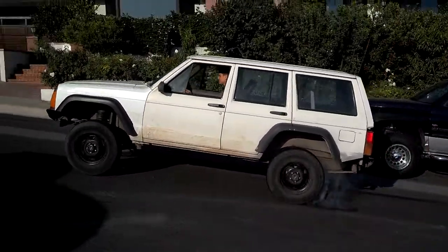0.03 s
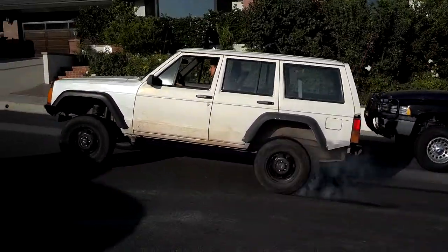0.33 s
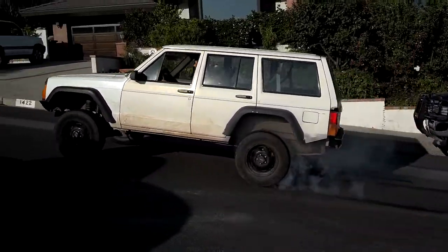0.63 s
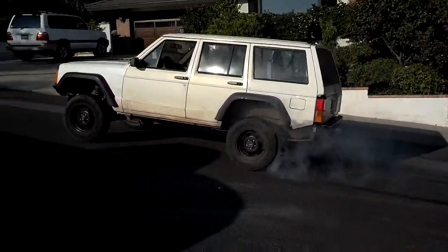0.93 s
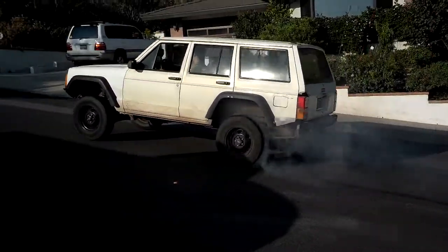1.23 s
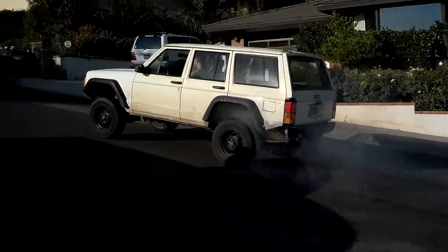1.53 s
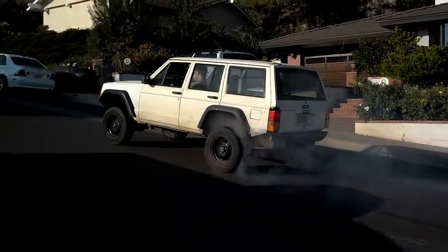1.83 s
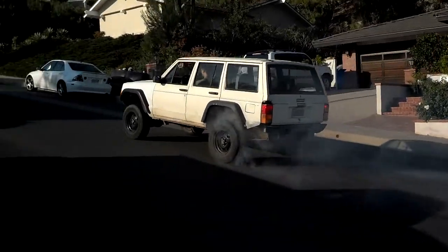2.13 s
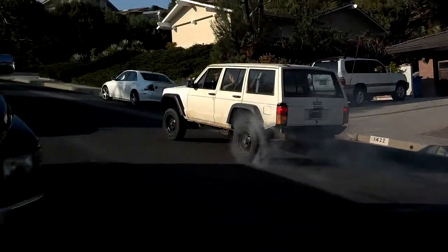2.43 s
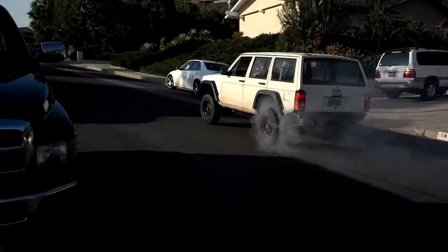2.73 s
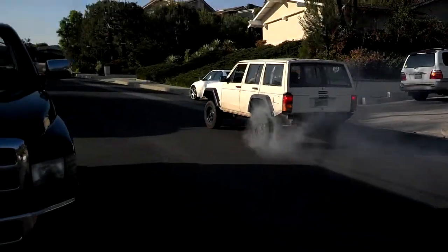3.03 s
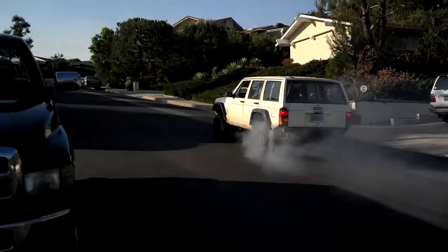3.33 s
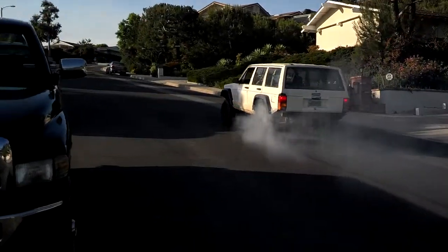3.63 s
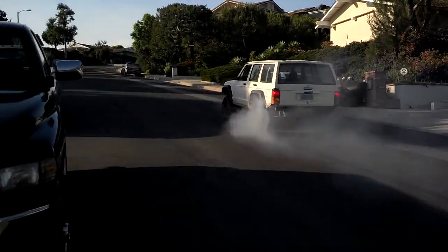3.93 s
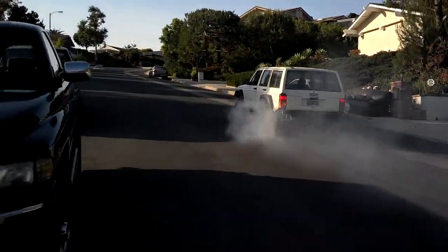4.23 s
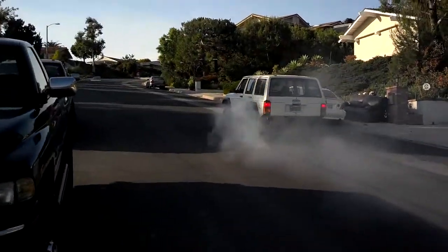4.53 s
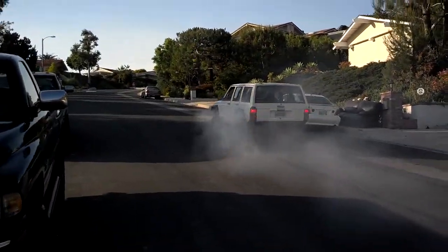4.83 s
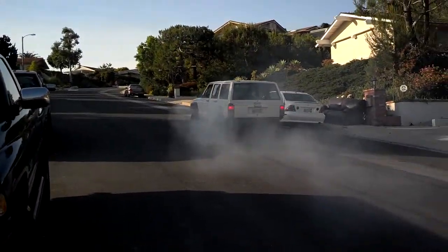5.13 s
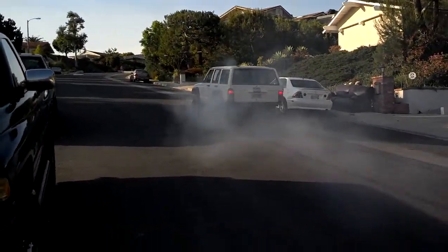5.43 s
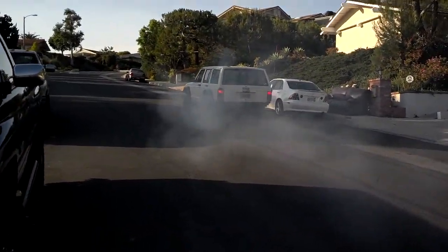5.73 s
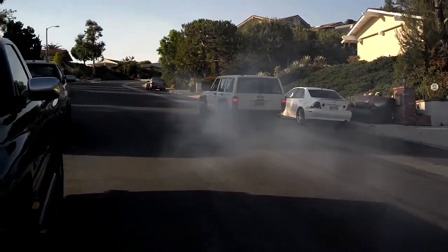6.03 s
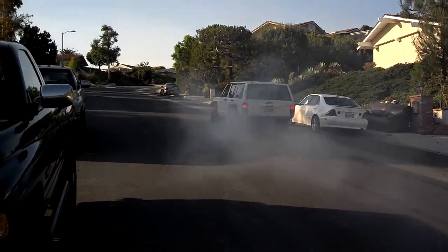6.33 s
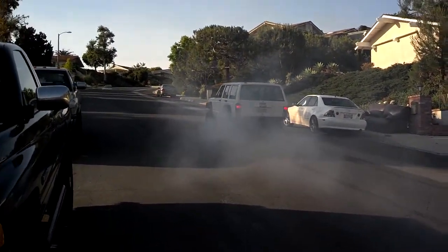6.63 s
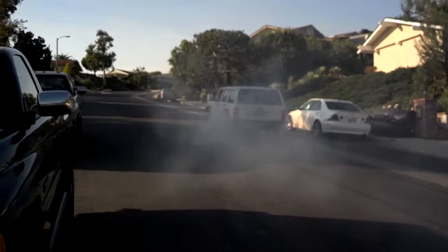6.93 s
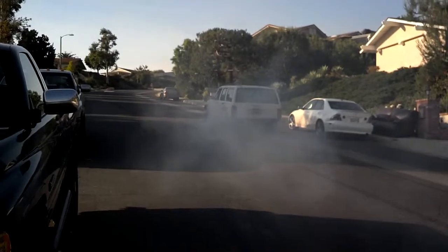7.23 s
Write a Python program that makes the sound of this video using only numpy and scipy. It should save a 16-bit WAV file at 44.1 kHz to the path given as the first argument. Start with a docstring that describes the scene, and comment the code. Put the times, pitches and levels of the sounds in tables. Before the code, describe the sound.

An SUV does a burnout, its engine droning hard while a spinning tyre scrubs, howls and chirps on asphalt, slowly moving away.

```python
"""A six-cylinder SUV does a burnout up a residential street and slowly moves away.
Its engine pulls hard, stumbles with three thuds, drones, then revs up again; each firing sends a
puff of gas down the exhaust pipe. The spinning rear tyre sticks and slips on the asphalt, so it
scrubs, howls and chirps, and it sprays hissing grit. Near the end a house front echoes the exhaust.
A small stereo microphone listens through two openings, its left and right ports."""
import sys
import numpy as np
from scipy import signal
from scipy.fft import rfft, irfft, next_fast_len
from scipy.io import wavfile
from scipy.ndimage import uniform_filter1d, map_coordinates

SR = 44100
rng = np.random.default_rng(int(sys.argv[2]) if len(sys.argv) > 2 else 0)


def output_pcm(signal):
    """Save a mono or channel-first signal as 16-bit PCM at the path in sys.argv[1].

    Samples are clipped to [-1, 1] before scaling.
    """
    pcm = np.clip(np.atleast_2d(signal).T, -1, 1) * 32767
    wavfile.write(sys.argv[1], SR, np.round(pcm).astype(np.int16))


N = 330309
CALM_HZ, CRUISE_HZ = 198, 218.6  # engine firings a second: running calmly, cruising
PIPE_LOW_HZ = 70.4  # the open exhaust pipe gives off little sound below this


def amp(db):
    """Turn decibels into a gain to multiply by."""
    return 10 ** (np.asarray(db) / 20)


def unit(x):
    """Scale a signal so that its average level (rms) is 1."""
    return x / np.sqrt(np.mean(x ** 2) + 1e-20)


def along(points, hz):
    """Read between (pitch_hz, value) points, with octaves evenly spaced."""
    pitches, values = np.transpose(points)
    return np.interp(np.log(hz + 1), np.log(pitches + 1), values)


def curves(rows):
    """Turn each column after the time into one value per sample."""
    times, *columns = np.transpose(rows)
    return [np.interp(np.arange(N) / SR, times, column) for column in columns]


def bump(middle_s, half_s):
    """A smooth swell that reaches 1 at middle_s."""
    return np.exp(-((np.arange(N) / SR - middle_s) / half_s) ** 2)


def wobble(rate):
    """A smooth curve through `rate` random values a second."""
    at = np.linspace(0, rate * N / SR, N // 16)
    coarse = map_coordinates(rng.standard_normal(8192), [at], mode="wrap")
    return np.interp(np.arange(N), np.linspace(0, N, len(at)), coarse)


def throb(turns, depth):
    """A gain that swells once a turn."""
    return unit(1 + depth * np.cos(2 * np.pi * turns))


def filtered(x, response):
    """Change the strength and phase of each frequency in x by response(hz)."""
    size = next_fast_len(N + 8192)
    return irfft(rfft(x, size) * response(np.fft.rfftfreq(size, 1 / SR)), size)[..., :N]


def rush(spectrum, patchy_db):
    """Stereo noise of level 1, shaped by a spectrum, with brief louder and softer patches."""
    # how alike the two ports sound: pitch_hz, likeness (0-1)
    alike = [(40, 0.36), (100, 1), (400, 0.88), (800, 0.78), (1600, 0.54), (2400, 0.72), (3200, 0.44),
             (5000, 0.16), (8000, 0.034)]
    cells = signal.stft(rng.standard_normal((2, N)), nperseg=1024)[2]
    patches = uniform_filter1d(rng.standard_normal(cells.shape[1:]), size=3, axis=0)
    patches = uniform_filter1d(patches, size=3, axis=1)
    pair = signal.istft(cells * amp(patchy_db * unit(patches)), nperseg=1024)[1][:, :N]

    def colour_and_spread(hz):
        spread = np.arccos(np.clip(along(alike, hz), -1, 1)) / 2
        return amp(along(spectrum, hz)) * [np.cos(spread), np.sin(spread)]

    mid, side = filtered(pair, colour_and_spread)
    return unit(np.array([mid + side, mid - side]))


def engine_load():
    """How hard the engine works (0-1): load builds as each pull starts and lets go after it."""
    # pulls at full load: start_s, end_s
    pulls = [(-0.3, 0.767), (6.82, 7.5)]
    rise_s, fall_s, free_load = 0.048, 0.074, 0.047
    t = np.arange(N) / SR
    pull = sum(np.clip((t - start) / rise_s, 0, 1) * np.clip(1 - (t - end) / fall_s, 0, 1)
               for start, end in pulls)
    return free_load + (1 - free_load) * pull


def engine_drone(firing_hz, firings, load, ragged):
    """Even firings make a steady note and a second one an octave above it."""
    # the note at the firing rate: time_s, level_db
    drone_levels = [(0, -26.5), (.3, -23), (.44, -30.5), (.58, -20), (.803, -26), (.813, -14.5),
                    (.835, -23), (.885, -17.5), (1.03, -22.5), (1.95, -17), (2.3, -21), (2.9, -18.5),
                    (3.85, -23.5), (4.5, -20), (5.1, -24), (5.55, -20), (5.9, -21), (6.85, -19), (7.2, -23),
                    (7.33, -28.5), (7.49, -21.5)]
    # how strongly the pipe sounds the octave, running free and under load: pitch_hz, free_db, loaded_db
    octave_levels = [(354, -24, -25.5), (383.7, -33, -27.5), (395.4, -25, -36), (409.2, -43.5, -36),
                     (425.6, -33.5, -24.5), (460, -37.5, -22.5), (477, -38, -22), (486, -28, -30),
                     (492, -23, -42), (500, -29, -24), (519, -35, -29), (526, -35, -40)]
    angle = 2 * np.pi * firings
    shake = 0.044 + 0.058 * load
    drone_db, = curves(drone_levels)
    drone = amp(drone_db + 0.75 * wobble(14)) * (1 + shake * wobble(40)) * np.sin(angle)
    pitch_hz, free_db, loaded_db = np.transpose(octave_levels)
    octave_db = (1 - load) * np.interp(2 * firing_hz, pitch_hz, free_db)
    octave_db += load * np.interp(2 * firing_hz, pitch_hz, loaded_db)
    octave_gain = amp(octave_db + 1.27 * wobble(11)) * (1 + (shake + ragged) * wobble(50))
    return drone + octave_gain * np.sin(2 * angle + rng.uniform(0, 2 * np.pi))


def engine_growl(firing_hz, firings, load, ragged):
    """Unequal cylinders add fluttering tones at multiples of the engine cycle (six firings)."""
    # exhaust tones, running free and under load: cycle_multiple, free_db, loaded_db
    tones = [(4, -36.5, -33), (5, -46.5, -50), (7, -43, -39.5), (8, -41.5, -32.5), (9, -34.5, -37.5),
             (10, -42.5, -32.5), (11, -56, -46), (14, -47, -31.5), (15, -45.5, -42), (16, -51, -36),
             (17, -50, -41), (18, -41.5, -36), (20, -43, -42), (21, -45.5, -51), (24, -37.5, -44)]
    # pipe resonances lift or lower each tone that glides through them: pitch_hz, gain_db
    pipe = [(125, -11.5), (150, -9), (175, 2.5), (235, -5.5), (255, 0.5), (290, 1), (325, -2), (352, 6),
            (390, 2), (418, 1.5), (445, -3.5), (500, 0), (560, -0.5), (616, 3.5), (660, 1), (715, -3),
            (754, 4.5), (785, -4.5), (830, -2)]
    # single tones swell or sink for a while: middle_s, half_length_s, cycle_multiple, gain_db
    swells = [(.1, 0.084, 4, 10), (.08, .17, 14, -21), (0.43, 0.12, 10, 8), (.5, .14, 8, -10),
              (0.624, 0.15, 14, 4), (1.9, 1.4, 8, 4.5), (1.58, 0.17, 9, 3), (2.6, .2, 9, 5),
              (5.95, .3, 9, 1), (6.07, 0.2, 24, 4.5), (6.72, .3, 18, 4.5), (6.8, .25, 9, 2),
              (6.85, .11, 14, -13), (6.953, 0.089, 10, 4.5), (7.38, 0.15, 10, -15), (7.38, .16, 9, -9),
              (7.47, .09, 18, -9)]
    cylinders = 6
    angle = 2 * np.pi * firings
    loaded_rise_db = np.linspace(0, 0.5, N)
    growl = np.zeros(N)
    for multiple, free_db, loaded_db in tones:
        ratio = multiple / cylinders
        level_db = free_db + load * (loaded_db + loaded_rise_db - free_db)
        level_db += along(pipe, ratio * firing_hz) + 1.17 * wobble(12)
        level_db += sum(db * bump(s, half_s) for s, half_s, tone, db in swells if tone == multiple)
        depth = 0.42 if multiple % 3 else 0.2  # tones from a group of three cylinders are the steadiest
        drift = rng.uniform(0, 2 * np.pi) + (0.22 + ragged) * wobble(30)
        flutter = 1 + (depth + ragged + 0.08 * load) * wobble(45)
        growl += amp(level_db) * flutter * np.sin(ratio * angle + drift)
    return growl


def gas_roar(firings, load):
    """Swirling gas leaves the pipe in one puff per firing."""
    # spectrum of the gas noise: pitch_hz, relative_db
    spectrum = [(20, -60), (50, -48), (70, -39), (100, -9), (150, -12), (290, 1.5), (355, 3), (480, -4),
                (700, -4), (1200, -8.5), (3000, -73)]
    roar = rush(spectrum, patchy_db=2.5) * throb(firings, depth=0.3)
    roar = filtered(roar, lambda hz: 1 / np.hypot(1, (PIPE_LOW_HZ / (hz + 1)) ** 4))
    return amp(np.linspace(-35, -37.4, N) + 2.6 * load) * roar


def engine(firing_hz, firings):
    """Drone, growl and roar together. Running fast without load, the engine burns less evenly."""
    load = engine_load()
    ragged = 0.28 * (1 - load) * np.clip((firing_hz - CALM_HZ) / (CRUISE_HZ - CALM_HZ), 0, 1)
    drone = engine_drone(firing_hz, firings, load, ragged)
    growl = engine_growl(firing_hz, firings, load, ragged)
    return drone + growl + gas_roar(firings, load)


def squeal(hz, width_hz):
    """A fuzzy note of level 1, like rubber kept ringing by irregular slips."""
    angle = 2 * np.pi * np.cumsum(hz) / SR
    return unit(wobble(width_hz) * np.cos(angle) + wobble(width_hz) * np.sin(angle))


def tyre_rubber(speed_octaves, firings, dig_db):
    """Rubber sticks and slips, juddering as the tread slaps the road. Faster: more scrub, less howl."""
    # the two notes at which the rubber rings: time_s, low_hz, high_hz, low_level_db
    notes = [(0, 773, 1706, -9.5), (1.5, 834, 1666, -11.5), (3.1, 758.4, 1607, -9.5),
             (3.8, 781.2, 1752, -8), (4.3, 780, 1748, -9), (5.1, 779, 1614, -8), (5.8, 765, 1600, -17),
             (7.49, 716, 1584, -15)]
    # spectrum of the scrubbing: pitch_hz, relative_db
    scrub_spectrum = [(300, -64), (520, -7), (760, -2.5), (980, -7), (1220, -2.5), (1450, -6.5),
                      (1900, -12), (2400, -13), (4000, -93)]
    # spectrum of the howl: pitch_hz, relative_db
    howl_spectrum = [(900, -36), (1300, -0.5), (1600, 3.5), (1800, 3.5), (2050, 0), (2400, -5), (3200, -11),
                     (6000, -44)]
    low_hz, high_hz, low_db = curves(notes)
    heat = np.linspace(0, 1, N)  # as the rubber warms, it sings more and scrapes less
    judder = unit(amp(0.38 * wobble(190)))
    scrub = amp(-2 - 0.59 * heat) * rush(scrub_spectrum, patchy_db=2.0)
    scrub += amp(low_db) * squeal(low_hz, width_hz=80)
    chatter = unit(amp(3.0 * wobble(260)) * squeal(high_hz, width_hz=130))  # rings in short bursts
    howl = amp(-2 - 3.5 * heat) * rush(howl_spectrum, patchy_db=3.5)
    howl += amp(-12 + 4.5 * heat) * chatter
    howl *= throb(firings, depth=0.086) * unit(amp(1.1 * wobble(25)))
    return (amp(2.5 * speed_octaves + dig_db) * scrub + amp(-8 * speed_octaves) * howl) * judder


def grit_spray(speed_octaves, dig_db):
    """Grit torn off the asphalt makes a rough hiss, louder when the wheel spins faster."""
    # spectrum of the hiss: pitch_hz, relative_db
    spectrum = [(1000, -34), (2300, 2), (3300, 1.5), (4000, 1.5), (5000, -3), (6000, -8.5), (7000, -11),
                (8200, -17.5), (9600, -11.5), (12000, -16.5), (15500, -14)]
    # the finest fizz is lost with distance: pitch_hz, fading_share (0-1)
    fading = [(5000, 0.021), (9000, 0.79)]
    start_m, away_m_per_s = 5.6, 1.51
    nearness = start_m / (start_m + away_m_per_s * np.arange(N) / SR)
    roughness = unit(amp(0.58 * wobble(900) + 0.47 * wobble(50) + 0.14 * wobble(5.9)))
    hiss = amp(-29.5 + 5 * speed_octaves + dig_db) * nearness * roughness * rush(spectrum, patchy_db=2.0)
    fizz = filtered(hiss, lambda hz: along(fading, hz))
    return (hiss - fizz) + amp(np.linspace(2, -4.4, N)) * fizz


def tyre(firing_hz, firings, rub_db):
    """The rear tyre spins with the engine, rubbing on the road and throwing grit."""
    # the tyre digs in or eases off: middle_s, half_length_s, scrub_db, hiss_db
    digs = [(0.153, 0.31, -1.5, 2), (0.56, 0.13, 0.5, 2.5), (0.773, 0.036, -10, -3.5),
            (1.023, 0.08, -3.5, -2.5), (3.2, 0.33, 3.5, -1), (3.472, 0.34, 0, 3.5), (4.124, 0.26, 0.5, 2.5),
            (5.68, 0.15, -2.5, 1.5), (6.4, 0.13, 0.5, -1.5)]
    scrub_db, hiss_db = sum(np.outer(gains_db, bump(s, half_s)) for s, half_s, *gains_db in digs)
    speed_octaves = np.log2(firing_hz / CRUISE_HZ)
    rubber = amp(rub_db) * tyre_rubber(speed_octaves, firings, scrub_db)
    return rubber + grit_spray(speed_octaves, hiss_db)


def street_rumble():
    """A quiet low rumble of the street, slowly fading."""
    # spectrum of the rumble: pitch_hz, relative_db
    spectrum = [(20, -39), (50, -33), (66, -4), (85, 5), (130, 5.5), (200, 17.5), (400, -34)]
    return amp(np.linspace(-38, -58, N)) * rush(spectrum, patchy_db=2.5)


def tyre_chirps(rub_db):
    """For a moment the slips lock into one unsteady note; fainter squeaks fall among the loud ones."""
    # the tread grabs and chirps: middle_s, pitch_hz, peak_db, half_length_s
    loud = [(0.219, 1644, -21, 0.027), (0.419, 1780, -26, 0.017), (0.463, 1630, -15.5, 0.012),
            (0.596, 744, -21, 0.035), (0.669, 715, -21.5, 0.05), (0.901, 1665, -18, .012),
            (1.234, 1420, -22, 0.012), (1.328, 1430, -22, .015), (2.345, 1448, -22, .02),
            (2.476, 1540, -21, .015), (2.643, 1540, -22, 0.013), (2.695, 1290, -22.5, 0.02),
            (2.858, 1295, -22, 0.02), (3.024, 1412, -25, .015), (3.117, 1259, -21, 0.014),
            (3.249, 1205, -22, .015), (3.349, 1421, -21, .016), (3.444, 1356, -20, 0.014),
            (3.417, 1707, -22, 0.014), (3.43, 1193, -19.5, 0.021), (3.545, 1560, -24, .015),
            (3.611, 1182, -16, 0.016), (3.71, 1783, -25, 0.039), (3.87, 1282, -20, 0.011),
            (3.91, 1220, -19, .015), (3.966, 1750, -22, 0.029), (3.972, 1454, -19.5, 0.021),
            (4.247, 1200, -23, 0.018), (4.455, 1747, -21, 0.015), (4.9992, 1603, -12.5, 0.0033),
            (5.003, 1620, -14, 0.0022), (5.358, 1670, -18, 0.01), (5.373, 1682, -21, 0.014),
            (5.407, 1620, -25, 0.02), (5.44, 1592, -22, .012), (5.866, 1602, -23, 0.019),
            (6.18, 1589, -28, 0.032), (6.612, 1630, -21, 0.02), (6.727, 1600, -24.5, 0.02),
            (6.937, 1621, -24, 0.02)]
    squeak_low_hz, squeak_range_hz, squeak_half_s = 1117.5, 758, 0.025
    t = np.arange(N) / SR
    flutter, stutter = wobble(260), wobble(300)
    faint = []
    for when, pitch, size in rng.random((110, 3)):
        peak_db = rub_db[int(when * N)] - 8.5 * (1 - size) - 1.7 * when
        faint.append((when * N / SR, squeak_low_hz + squeak_range_hz * pitch, peak_db, squeak_half_s))
    out = np.zeros(N)
    for middle_s, hz, peak_db, half_s in loud + faint:
        near = slice(max(0, round((middle_s - half_s) * SR)), round((middle_s + half_s) * SR))
        offset_s = t[near] - middle_s
        swell = np.cos(np.pi / 2 * offset_s / half_s) ** 2
        note = np.sin(2 * np.pi * hz * offset_s + 0.089 * flutter[near])
        out[near] += amp(peak_db) * swell * (1 + 0.11 * stutter[near]) * note
    return out


def exhaust_pops():
    """Each uneven firing is a low thud, a short bark of the pipe and a puff of gas."""
    # uneven firings: start_s, thud_db, thud_hz, bark_db, bark_hz, puff_db
    pops = [(.731, -13.5, 122, -27, 340, -26), (0.811, -14, 118, -20, 492, -18),
            (0.963, -14.5, 100, -38, 368, -35), (2.247, -32, 120, -24, 498, -20),
            (4.077, -44, 120, -19.5, 309, -25), (4.24, -50, 120, -20, 294.3, -31)]
    # spectrum of a puff: pitch_hz, relative_db
    puff_spectrum = [(80, -22), (180, -5), (330, -6), (520, 1), (780, 2), (1100, -4), (2500, -32)]
    rise_s = 0.003
    thud_s, bark_s, puff_s = 0.054, 0.27, 0.18  # time to fade by 60 dB
    tones, puffs = np.zeros((2, N + SR))
    t = np.arange(SR // 2) / SR
    for start_s, thud_db, thud_hz, bark_db, bark_hz, puff_db in pops:
        start = round(start_s * SR)
        rise = 1 - np.exp(-t / rise_s)
        thud = amp(thud_db - 60 * t / thud_s) * np.sin(2 * np.pi * thud_hz * t)
        bark = amp(bark_db - 60 * t / bark_s) * np.sin(2 * np.pi * bark_hz * t)
        tones[start:start + len(t)] += (thud + bark) * rise
        puffs[start:start + len(t)] += amp(puff_db - 60 * t / puff_s) * rise
    from_pipe = filtered(tones[:N], lambda hz: (1j * hz / (PIPE_LOW_HZ + 1j * hz)) ** 3)
    return from_pipe + puffs[:N] * rush(puff_spectrum, patchy_db=2.0)


def faint_flutter():
    """Three very faint swells of low, fluttering noise come and go near the end."""
    # swells: middle_s, half_length_s, phase_step_hz, level_db
    swells = [(6.08, .2, 15330, -66), (6.35, .1, 12450, -68), (6.76, .09, 12450, -65)]
    # given one number instead of a curve, squeal holds its angle still and only its slow wobble is left
    return sum(amp(db) * bump(s, half_s) * squeal(hz, width_hz=60) for s, half_s, hz, db in swells)


def house_echo(exhaust):
    """One late, dull echo off a house front; it beats against the drone while the revs climb."""
    # the echo grows as the car comes level with the house: time_s, level_db
    echo_levels = [(0, -50), (6.75, -38), (6.92, -14), (7.15, -7), (7.49, -6)]
    delay_s, top_hz = 0.0793, 330
    echo_db, = curves(echo_levels)
    late_and_dull = lambda hz: np.exp(-2j * np.pi * hz * delay_s) / np.hypot(1, (hz / top_hz) ** 4)
    return amp(echo_db) * filtered(exhaust, late_and_dull)


def scene():
    """The exhaust, its echo, the tyre and a low street rumble as they reach the two ports."""
    # engine speed: time_s, firing_hz
    revs = [(0.0, 227.3), (0.45, 255.6), (0.7, 266.1), (0.79, 251.5), (0.92, 243), (1.13, 227),
            (1.35, 234.1), (1.7, 232.8), (2.0, 226.9), (2.3, 220.6), (2.88, 209), (3.33, 221.5),
            (3.47, 217.9), (3.62, 201.1), (3.8, 193), (4.35, 193.2), (5.0, 196.1), (5.55, 198),
            (5.9, 194.2), (6.55, 180.5), (6.84, 176.4), (7.03, 195.8), (7.23, 221), (7.49, 247.2)]
    # how hard the tyre rubs on the road: time_s, level_db
    rubbing = [(0, -24), (.2, -22.5), (.62, -23), (1.02, -26), (1.2, -22.5), (1.8, -25.5), (2.3, -23.5),
               (2.55, -25), (3.3, -25), (3.77, -25.5), (4.0, -24.5), (4.3, -24), (4.41, -28), (4.6, -26),
               (5.2, -25.5), (5.38, -25.5), (5.62, -27), (6.0, -25.5), (6.45, -28.5), (7.2, -28),
               (7.49, -29)]
    firing_hz, = curves(revs)
    rub_db, = curves(rubbing)
    firings = np.cumsum(firing_hz * (1 + 0.0016 * wobble(20))) / SR  # running count of firings
    exhaust = engine(firing_hz, firings) + exhaust_pops()
    wheels = street_rumble() + tyre(firing_hz, firings, rub_db) + tyre_chirps(rub_db)
    return exhaust + wheels + faint_flutter() + house_echo(exhaust)


def record(dry):
    """The microphone widens the stereo: above the bass, each side subtracts the delayed other port."""
    # how far the left port is ahead of the right: pitch_hz, lead_radians
    lead = [(60, 1.36), (200, 0.5), (380, 0.97), (600, 0.15), (1000, 0.48), (2000, 0.66), (4000, 3.04),
            (8000, 0.48)]
    port_delay_s, bass_hz, top_hz = 16 / SR, 520, 15800
    ports = filtered(dry, lambda hz: np.exp(0.5j * np.outer([1, -1], along(lead, hz))))
    share = lambda hz: 1 - np.exp(-(hz / bass_hz) ** 2)
    opposite = filtered(ports[::-1], lambda hz: share(hz) * np.exp(-2j * np.pi * hz * port_delay_s))
    return filtered(ports - opposite, lambda hz: (hz < top_hz) / np.hypot(1, share(hz)))


dry = scene()
out = record(dry)
output_pcm(out)
```